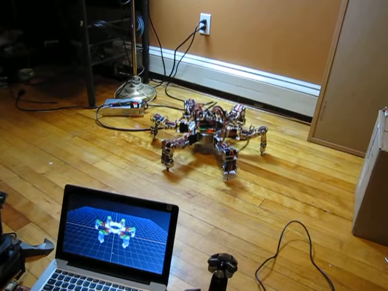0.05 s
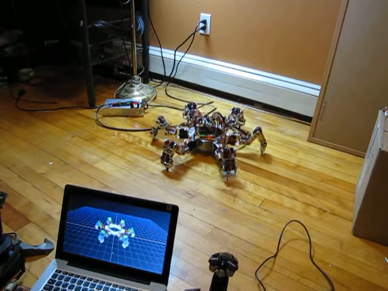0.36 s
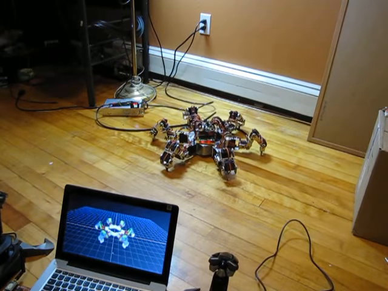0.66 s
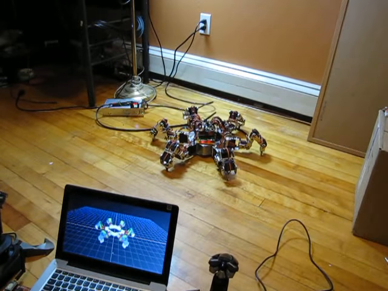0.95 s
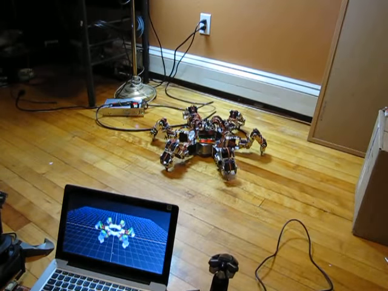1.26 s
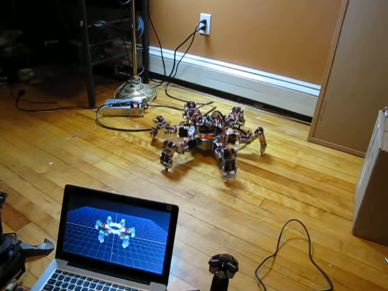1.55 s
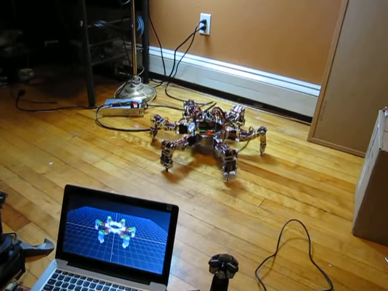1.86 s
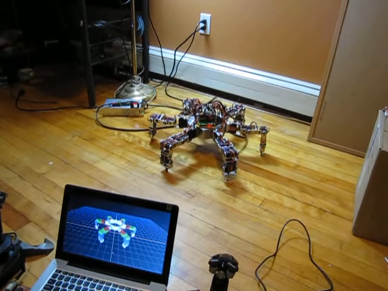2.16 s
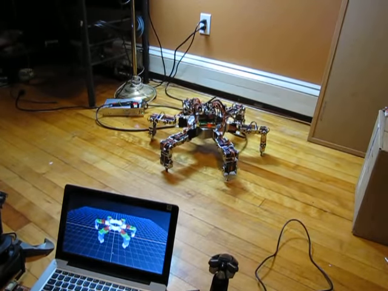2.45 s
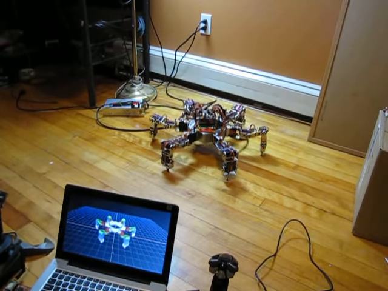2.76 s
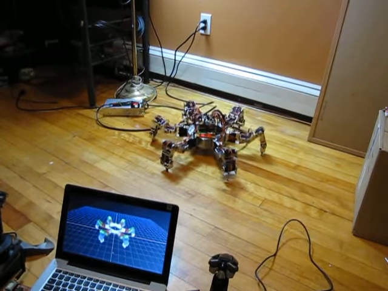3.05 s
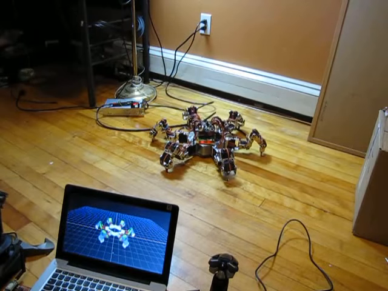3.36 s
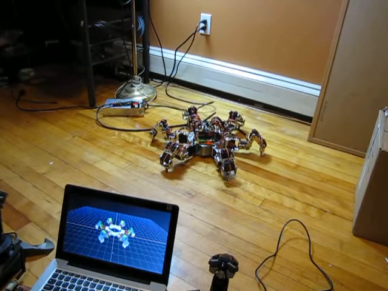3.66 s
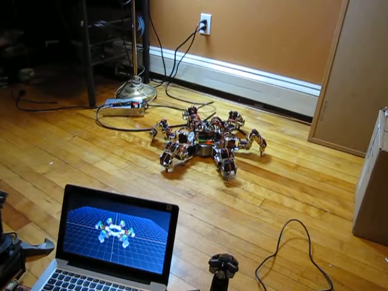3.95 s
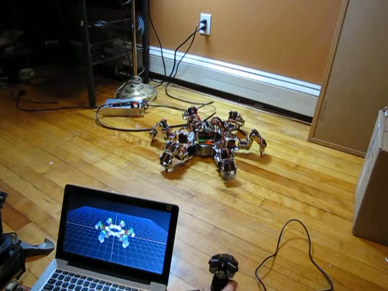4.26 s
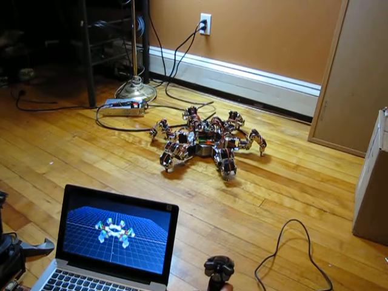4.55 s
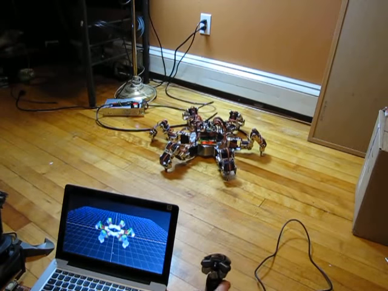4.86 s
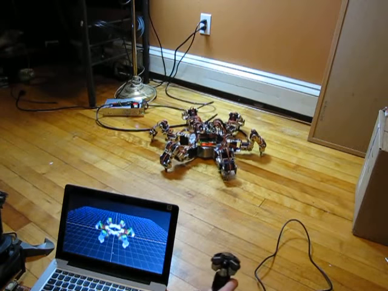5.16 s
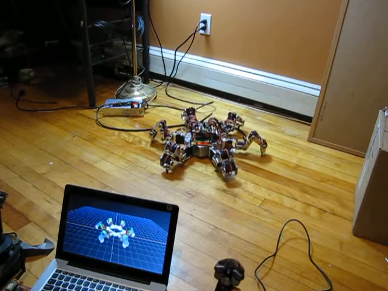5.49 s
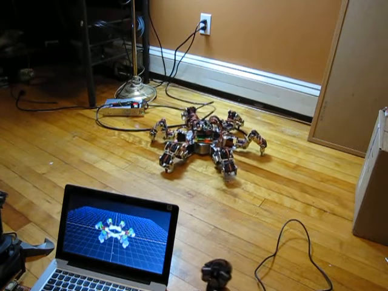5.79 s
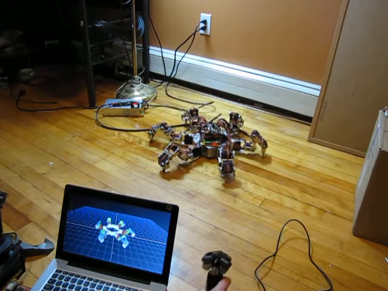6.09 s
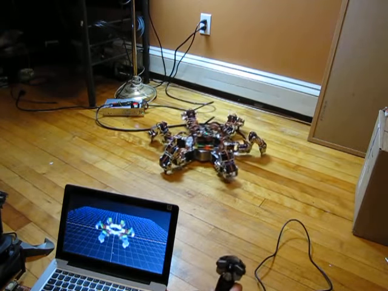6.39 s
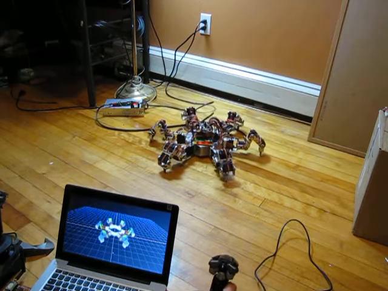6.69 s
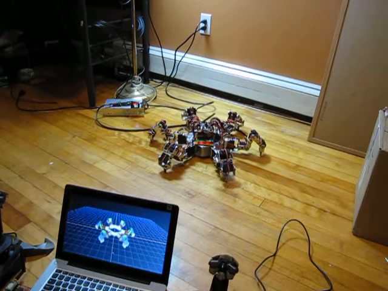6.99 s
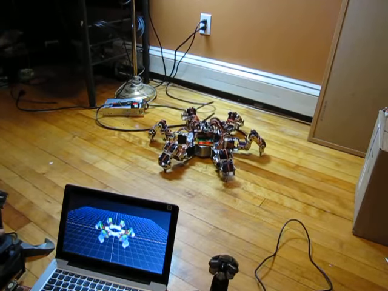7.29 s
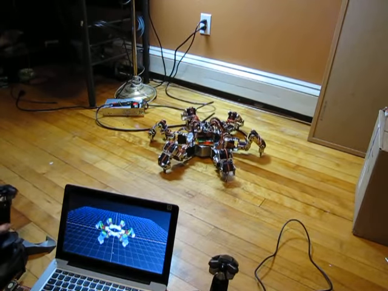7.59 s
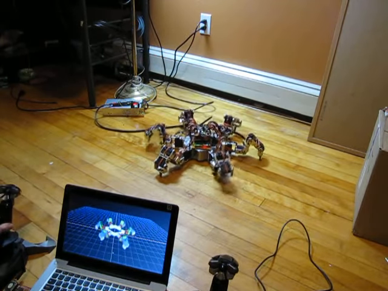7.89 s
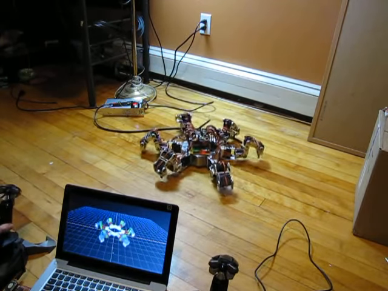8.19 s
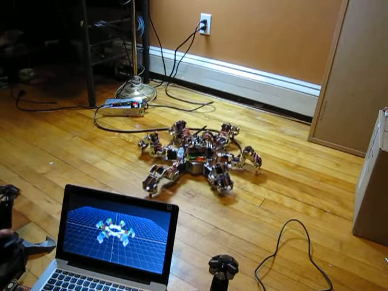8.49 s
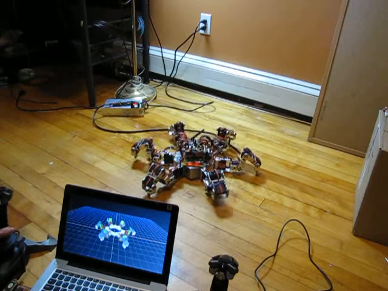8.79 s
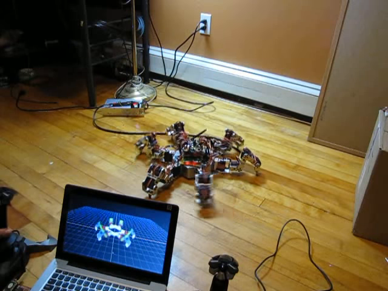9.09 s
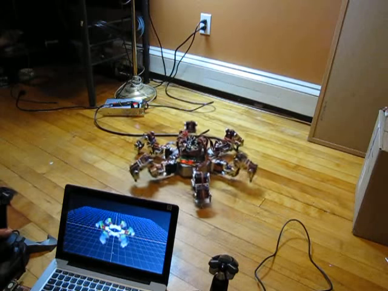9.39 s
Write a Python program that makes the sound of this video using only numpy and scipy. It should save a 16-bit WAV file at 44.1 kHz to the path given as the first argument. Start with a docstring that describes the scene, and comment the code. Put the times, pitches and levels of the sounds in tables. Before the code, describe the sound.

A small legged robot moves on a hardwood floor, heard from nearby in a small room with a faint hum and low rumble. From the start, servo motors whir in short, high, buzzy bursts, each with a rattle of linkage and a low drone in the boards. Hard feet clack and thump, strongly at about 0.5 seconds, then around 1.5, 2 and 2.8 to 3.3 seconds. A lull follows until about 4.6 seconds, when small twitching ticks and whirs return and grow busier. Brief high squeaks come near 6 and 6.5 seconds, with firm foot knocks around 6.3 to 6.6. From 6.7 to 7.6 seconds the motors tick rapidly and evenly while holding still. Then the robot walks, with quick repeated whirs and the loudest clacks and thumps at about 8, 8.4 and 9 seconds, whirring on until about 9.4 seconds.

```python
"""Six-legged robot on hardwood

A robot flexes, then walks across the floor of a small room. Its servo gears whir in bursts, rattle
the linkage and drone through the legs into the boards; hard feet clack down and thump the floor.
While it holds a pose, the servos tick at each control pulse. A hum and a low rumble lie underneath."""
import sys
import numpy as np
from scipy import signal
from scipy.fft import rfft, irfft
from scipy.io import wavfile

SR = 44100
rng = np.random.default_rng(int(sys.argv[2]) if len(sys.argv) > 2 else 0)


def wav_record(signal):
    """Record a signal, one row per channel, as 16-bit PCM in the file named by sys.argv[1]."""
    frames = np.transpose(np.atleast_2d(signal))
    bounded = np.clip(frames, -1, 1)
    # unit amplitude maps onto the largest positive 16-bit level
    quanta = np.round(bounded * 32767).astype(np.int16)
    wavfile.write(sys.argv[1], SR, quanta)


N = 416304
TIME, HZ = np.arange(N) / SR, np.fft.rfftfreq(N, 1 / SR)
CONTROL_TIME = TIME[::64]  # coarse clock for the servo envelopes

# EQ curves of the three noise beds: freq_hz, gain_db
AIR_EQ = [(12, -28), (20, -8), (44, -9), (62, -4), (80, -13), (123, -17), (172, -22), (410, -17),
          (542, -26), (590, -16), (660, -48), (1570, -32), (1710, -31.5), (9400, -42), (16000, -48)]
RUMBLE_EQ = [(8, -7), (15, 11), (20, 10), (25, -9), (36, 0), (48, -28), (63, -0.5), (80, -22), (110, -5),
             (200, -67)]
RUSH_EQ = [(100, 4), (300, 3), (600, 2.5), (1100, 5), (1700, -0.5), (2500, -8), (5000, -40)]
# Fader rides of the rumble and the soft rush: time_s, rumble_db, rush_db
BED_FADERS = [(0, -35, -45.5), (1.0, -51, -46.5), (1.6, -36.5, -47), (2.4, -45, -51.5), (3.2, -37.5, -53.5),
              (4.1, -66, -56), (7.5, -63, -57.5), (8.6, -51, -48), (9.44, -50, -70)]
# Partials of the hum: pitch_hz, level_db
HUM_PARTIALS = [(118.4, -62), (258.4, -63.5), (360.7, -67), (602.9, -64.5), (1556, -66.5)]
# Faint passing tones: start_s, end_s, start_pitch_hz, end_pitch_hz, jitter_hz, level_db
PASSING_TONES = [(0.65, 1.38, 108, 108, 1.05, -52), (2.15, 2.65, 160, 161, 1.3, -50.5),
                 (0.74, 1.18, 1020, 1060, 44.4, -53), (0.76, 1.5, 1200, 1240, 57, -59)]
# Reverb time of the room: freq_hz, t60_s
ROOM_DECAY = [(100, 0.14), (400, 0.36), (1500, 0.3), (5000, 0.28), (10000, 0.15), (16000, 0.13)]
# Left-right likeness of diffuse sound: freq_hz, correlation
STEREO_LIKENESS = [(30, 0.74), (250, 0.84), (640, 0.82), (1400, 0.61), (3100, 0), (6800, 0), (15000, 0.12)]
# Balance of the two microphones: freq_hz, left_minus_right_db
MIC_BALANCE = [(30, 3.5), (120, 2), (300, 1.2), (1000, 1.5), (2000, -0.5), (4500, 0.8), (8000, 1),
               (12000, -1)]

# Servo start-up chirps, foot scuffs and joint squeaks: start_s, end_s, pitch_hz, width_hz, level_db
SQUEAKS_AND_CHIRPS = [(1.206, 1.26, 5200, 911, -46), (2.608, 2.643, 5000, 807, -41),
                      (2.759, 2.823, 522, 220, -39), (4.223, 4.3, 2215, 1190, -58),
                      (4.35, 4.52, 1505, 300, -63), (5.99, 6.129, 5324, 300, -32.5),
                      (6.063, 6.18, 290.6, 25, -35.5), (6.503, 6.545, 4110, 60, -29),
                      (6.701, 7.618, 2340, 300, -58), (8.212, 8.311, 4810, 150, -38.5),
                      (8.699, 8.748, 3300, 300, -36.5), (8.711, 8.775, 464, 100, -41)]
# Feet landing and joints knocking, clack level before its trim:
# start_s, clack_db, thump_db, tilt_db_per_octave, leg_pitch_hz, leg_over_clack_db
FOOTFALLS = [(0.06, -27, -41, -3, 2210, -1), (0.1469, -30.5, -41, -8.5, 2220, 7),
             (.246, -25, -21.5, -0.5, 2040, -3), (.271, -25, -31, -8.5, 1700, -18),
             (0.4706, -14, -14.5, -5, 3640, -3.5), (1.5422, -18, -26, -1.5, 2770, -17),
             (1.6036, -22, -30, -4.5, 2380, -12), (1.934, -19, -29, -3.5, 1910, -19),
             (2.002, -18, -31, -3, 2900, -22), (2.074, -23, -32, -2, 1767, -10),
             (2.8386, -18.5, -22, 1.5, 2265, -4), (3.107, -17, -20.5, 0, 2090, -16),
             (3.2497, -17, -18, -2.5, 3136, -9), (5.503, -29.5, -30.5, -5, 2333, -11),
             (6.296, -15.5, -17.5, -2.5, 2245, -7), (6.38, -14, -14.5, -3, 2500, -24),
             (6.562, -20.5, -21.5, -5.5, 2690, -15), (6.59, -25.5, -41, -4.5, 2290, -16),
             (7.93, -27.5, -35, -2, 1414, 0), (7.988, -16, -16, -2.5, 2210, -17),
             (8.0111, -12, -17, -1, 3545, 3.5), (8.0229, -14.5, -17.5, 16, 3845, .5),
             (8.4296, -11.5, -10.5, -4, 2357, -20), (8.439, -13.5, -13.5, 4.5, 3530, -3),
             (8.614, -27.5, -23, -14, 1390, -1.5), (9.0494, -13.5, -14.5, 4.5, 2746, -17),
             (9.0557, -18.5, -20, -4, 2556, 2), (9.071, -18, -23, -0.5, 1670, 2.5)]
# Ringing modes of the floorboards: pitch_hz, relative_level_db, t60_s
BOARD_MODES = [(117.3, -24.5, 0.48), (147.6, -0.5, 0.14), (213.1, -3, 0.2), (260.7, 0, 0.1),
               (303, -2, 0.17), (345.7, -8.5, 0.2), (442, -15.5, 0.2), (482.5, -13.5, 0.13),
               (630, -20, 0.096)]
# Servos kicking in or twitching, levels before the trim: start_s, level_db
TWITCHES = [(.332, -16.5), (.7168, -55), (1.203, -40), (1.8045, -32), (2.6117, -32), (4.2344, -40),
            (4.6337, -44), (4.726, -38), (5.053, -39), (5.368, -34), (5.6388, -26.5)]
# Leg movements, one servo run each, levels before the trims:
# start_s, length_s, whir_db, rattle_db, drone_db, whine_hz
LEG_MOVES = [(0.0, 0.085, -28, -35, -33, 4560), (0.209, 0.039, -36, -37, -36, 5016),
             (0.259, .11, -28, -34.5, -32.5, 5234), (0.398, 0.093, -31, -35.5, -38, 4420),
             (0.808, .06, -56, -58, -57, 4800), (1.194, 0.044, -43, -43, -43, 4420),
             (1.245, 0.05, -35, -46, -38, 4768), (1.341, .14, -36, -44, -38, 4764),
             (1.529, 0.1, -36, -40.5, -35, 4865), (1.799, .16, -34, -39.5, -40.5, 5160),
             (2.001, 0.14, -33, -37.5, -36, 4703), (2.516, .05, -47, -54, -48, 5100),
             (2.6, 0.045, -33, -40.5, -41, 4970), (2.663, 0.038, -32, -35.5, -31.5, 4500),
             (2.733, 0.14, -32, -35.5, -34.5, 4592), (2.994, 0.081, -34, -37.5, -33.5, 5131),
             (3.088, .07, -30, -36, -32, 4700), (3.209, 0.12, -31, -38.5, -36, 4616),
             (4.712, .03, -36, -46.5, -39, 4913), (4.914, 0.028, -47.5, -60, -52, 4933),
             (5.05, 0.062, -34, -44, -46, 5060), (5.115, 0.086, -29, -41, -42.5, 4800),
             (5.304, 0.029, -38, -44, -42, 5296), (5.384, 0.11, -28.5, -38.5, -37, 5150),
             (5.64, .05, -30, -41, -37.5, 4943), (5.715, .025, -37, -46, -50, 4830),
             (5.775, .065, -27, -39, -37.5, 4977), (5.901, 0.083, -28, -37, -38.5, 5000),
             (5.99, 0.11, -25, -38.5, -33.5, 5260), (6.18, 0.19, -25, -35.5, -36.5, 4960),
             (6.444, 0.11, -26, -36, -32.5, 4910), (6.644, .045, -35, -45, -40.5, 4838),
             (7.576, 0.11, -27, -35, -30.5, 4902), (7.765, 0.049, -26.5, -39.5, -43, 4833),
             (7.854, .045, -25.5, -38, -46, 5178), (7.914, 0.11, -25, -31.5, -33.5, 5120),
             (8.1, .05, -34, -43, -41.5, 4840), (8.188, .1, -30.5, -43.5, -58, 4784),
             (8.31, .11, -28.5, -42, -62, 4765), (8.49, .09, -33, -35, -32.5, 4889),
             (8.577, 0.085, -28.5, -34.5, -39, 5028), (8.7, 0.049, -41, -35, -53, 5026),
             (8.955, 0.052, -36, -40.5, -44, 4790), (9.028, .09, -31.5, -34, -33.5, 4883),
             (9.173, 0.067, -30.5, -37.5, -45, 4578), (9.294, 0.095, -34.5, -38.5, -55, 4620)]
# The pose held under load, same columns
HELD_POSE = (6.72, .85, -47.5, -44, -44, 4794)
SERVO_RUNS = LEG_MOVES + [HELD_POSE]
# Envelopes of the servo layers: level_column, rise_s, fade_db_per_s, rest_db
WHIR_ENV, RATTLE_ENV, DRONE_ENV = (2, .028, 190, -68), (3, .009, 110, -61.5), (4, .035, 92, -61.5)
# Bass ride on the floor drone: time_s, gain_db
DRONE_BASS_FADER = [(0, 4), (3.4, 4.5), (4.7, -2.5), (7.8, -5.5), (8.6, 2.5)]
# EQ curves of foot clack, servo tick, floor drone, linkage rattle and gear whir: freq_hz, gain_db
CLACK_EQ = [(40, -9), (150, -5), (450, -5.5), (800, 0), (1300, -3), (2000, 3.5), (2700, 4.5), (3600, 4.5),
            (4600, 1.5), (6500, -2.5), (9000, -10.5), (15000, -22)]
TICK_EQ = [(800, -34), (2400, 0), (3500, -6.5), (4800, 1), (6500, 1), (9000, -8), (12500, -12),
           (16000, -14)]
DRONE_EQ = [(25, -42), (60, -12), (100, -10.5), (150, -2), (215, -2), (300, -3), (360, -13), (450, -18.5),
            (800, -36)]
RATTLE_EQ = [(60, -32), (250, -28), (450, -1.5), (800, 1.5), (1200, -1), (1700, 2), (2300, 1), (3000, 0.5),
             (4500, -5.5), (8000, -15)]
WHIR_EQ = [(1000, -37), (2500, -16), (3950, -8.5), (4350, -3), (5200, -4), (6400, -5), (7900, -6.5),
           (9200, -12), (10600, -16), (12500, -14.5), (14000, -23.5), (16000, -33)]


def amp(db):
    """Decibels to gain."""
    return 10 ** (np.asarray(db) / 20)


def unit_rms(x):
    """Normalises to rms 1."""
    return x / np.sqrt(np.mean(x ** 2) + 1e-20)


def curve_at(curve, hz):
    """Reads a curve on a log-frequency axis."""
    freq_hz, value = np.transpose(curve)
    return np.interp(np.log(hz + 1), np.log(freq_hz + 1), value)


def add(mix, start_s, sound):
    """Drops a sound into the mix at its cue."""
    part = mix[max(round(start_s * SR), 0):][:len(sound)]
    part += sound[:len(part)]


def colour(x, eq):
    """Applies an EQ curve and normalises to rms 1."""
    return unit_rms(irfft(rfft(x) * amp(curve_at(eq, HZ)), N))


def wander(rate_hz):
    """Random modulator: low-passed noise at rms 1."""
    return unit_rms(irfft(rfft(rng.standard_normal(N)) / (1 + (HZ / rate_hz) ** 4), N))


def diffuse(pair):
    """Two unrelated signals as two close microphones hear them: alike in the bass."""
    left, other = rfft(pair)
    likeness = np.clip(curve_at(STEREO_LIKENESS, np.fft.rfftfreq(pair.shape[1], 1 / SR)), -1, 1)
    right = likeness * left + np.sqrt(1 - likeness ** 2) * other
    return irfft(np.array([left, right]), pair.shape[1])


def diffuse_noise(eq):
    """Coloured stereo noise from all sides."""
    return colour(diffuse(rng.standard_normal((2, N))), eq)


def room(x, wet_db, lag_s=2.8e-5, predelay_s=.003):
    """The direct sound reaches the right microphone first; the walls add a short tail."""
    t = np.arange(SR // 2) / SR
    echoes = rng.choice([-1., 1.], (2, len(t))) * (rng.random((2, len(t))) < .3)
    hz, age_s, bands = signal.stft(echoes, SR, nperseg=256)
    bands = bands * amp(-60 * age_s / curve_at(ROOM_DECAY, hz)[:, None])
    tail = signal.istft(bands, SR, nperseg=256)[1][:, :len(t)] * (t > predelay_s)
    tail /= np.linalg.norm(tail, axis=1)[:, None]
    direct = np.array([irfft(rfft(x) * np.exp(-2j * np.pi * HZ * lag_s), N), x])
    wet = diffuse(signal.fftconvolve(x[None], tail, axes=1)[:, :N])
    return (direct + amp(wet_db) * wet) / np.sqrt(1 + amp(2 * wet_db))


def scatter(x, eq, smear_s):
    """Bounces among the moving legs and the floor: diffuse noise that trails the power of x."""
    pole = np.exp(-1 / (smear_s * SR))
    power = signal.lfilter([1 - pole], [1, -pole], x ** 2 + 1e-20)
    return np.sqrt(power) * diffuse_noise(eq)


def impact(eq, tilt_db, chatter, chatter_s, contact_s=.0025, size=4096):
    """A sharp hit, a crunch of contact and a dying chatter of loose parts, at energy 1."""
    t, hz = np.arange(size) / SR, abs(np.fft.fftfreq(size, 1 / SR))
    contact, loose = rng.standard_normal((2, size)) * np.exp(-t / np.array([[contact_s], [chatter_s]]))
    hit = contact / np.linalg.norm(contact) + chatter * loose / np.linalg.norm(loose)
    hit[0] = .7  # the leading spike
    log_gain = np.log(amp(curve_at(eq, hz) + tilt_db * np.log2(np.maximum(hz, 500) / 3000)))
    minimum_phase = np.exp(signal.hilbert(log_gain).conj())  # keeps the attack crisp
    sound = np.fft.ifft(np.fft.fft(hit) * minimum_phase).real
    return sound / np.linalg.norm(sound)


def room_tone(air_db=-53):
    """The bed: steady air, with a low rumble and a soft rush that swell and sink."""
    time_s, rumble_db, rush_db = np.transpose(BED_FADERS)
    air = amp(air_db) * diffuse_noise(AIR_EQ)
    rumble = amp(np.interp(TIME, time_s, rumble_db)) * diffuse_noise(RUMBLE_EQ)
    rush = amp(np.interp(TIME, time_s, rush_db)) * diffuse_noise(RUSH_EQ)
    return air + rumble + rush


def hum_and_tones(waver_db=1.0):
    """A gently wavering hum, and a few faint tones that come and go."""
    out = np.zeros(N)
    for hz, db in HUM_PARTIALS:
        out += np.sqrt(2) * amp(db - waver_db * wander(2.3)) * np.sin(2 * np.pi * hz * TIME)
    for start_s, end_s, start_hz, end_hz, jitter_hz, db in PASSING_TONES:
        size = round((end_s - start_s) * SR)
        pitch_hz = np.linspace(start_hz, end_hz, size) + jitter_hz * wander(64)[:size]
        tone = np.sin(2 * np.pi * np.cumsum(pitch_hz) / SR)
        add(out, start_s, amp(db) * unit_rms(tone * signal.windows.tukey(size, .4)))
    return out


def squeaks_and_chirps():
    """Servo start-up chirps, foot scuffs and joint squeaks: each sings briefly in one resonance."""
    out = np.zeros(N)
    for start_s, end_s, hz, width_hz, db in SQUEAKS_AND_CHIRPS:
        size = round((end_s - start_s) * SR)
        note = wander(width_hz)[:size] * np.sin(2 * np.pi * hz * TIME[:size])
        add(out, start_s, amp(db) * unit_rms(note * signal.windows.tukey(size, .5)))
    return room(out, wet_db=-9)


def board_thump(t, rise_s=.0081, detune=.012):
    """Struck boards swell into a low ring, tuned a little differently from spot to spot."""
    ring = np.zeros(len(t))
    for hz, db, t60_s in BOARD_MODES:
        cycles = hz * (1 + detune * rng.standard_normal()) * t + rng.random()
        ring += amp(db - 60 * t / t60_s) * np.sin(2 * np.pi * cycles)
    return ring * (1 - np.exp(-t / rise_s))


def footsteps(clack_trim_db=21, leg_t60_s=.0067, bounce_db=-7):
    """A hard foot clacks down, its leg rings briefly and the floor thumps."""
    clacks, thumps, t = np.zeros(N), np.zeros(N), np.arange(SR // 2) / SR
    for start_s, clack_db, thump_db, tilt_db, leg_hz, leg_db in FOOTFALLS:
        gain = amp(clack_db + clack_trim_db)
        leg = np.sin(2 * np.pi * leg_hz * t) * amp(-60 * t / leg_t60_s)
        add(clacks, start_s, gain * impact(CLACK_EQ, tilt_db, chatter=1.0, chatter_s=.0085))
        add(clacks, start_s, gain * amp(leg_db) * leg / np.linalg.norm(leg))
        add(thumps, start_s, amp(thump_db) * board_thump(t))
    return (room(clacks, wet_db=-1) + amp(bounce_db) * scatter(clacks, CLACK_EQ, smear_s=.0041)
            + room(thumps, wet_db=-10))


def hold_pulses(first_s=6.7465, every_s=.03634, count=23, spread_db=1.7):
    """Tick cues (start_s, level_db), one per control pulse, growing unevenly as the pose is held."""
    levels_db = np.linspace(-33, -28.5, count) + spread_db * rng.standard_normal(count)
    return list(zip(first_s + every_s * np.arange(count), levels_db))


def servo_ticks(trim_db=16):
    """A loaded servo jerks against its gear play at each twitch or control pulse."""
    out = np.zeros(N)
    for start_s, db in TWITCHES + hold_pulses():
        add(out, start_s, amp(db + trim_db) * impact(TICK_EQ, tilt_db=0, chatter=1.8, chatter_s=.002))
    return room(out, wet_db=-8) + .7 * scatter(out, TICK_EQ, smear_s=.002)


def run_power(run, envelope):
    """Power of one layer in one servo run: it rises as the motors spin up, holds, then dies away."""
    level_column, rise_s, fade_db_per_s, _ = envelope
    start_s, length_s = run[:2]
    t = CONTROL_TIME - start_s
    level_db = run[level_column] - fade_db_per_s * np.maximum(t - length_s, 0)
    return (np.clip(t / rise_s, 0, 1) * amp(level_db)) ** 2


def layer_gain(envelope):
    """Fader of one servo layer: all runs add in power over the resting level."""
    rest_db = envelope[-1]
    power = amp(2 * rest_db) + sum(run_power(run, envelope) for run in SERVO_RUNS)
    return np.interp(TIME, CONTROL_TIME, np.sqrt(power))


def floor_drone(crossover_hz=147):
    """Gear vibration runs down the legs and drones in the boards, deeper in some poses than others."""
    noise = colour(rng.standard_normal(N), DRONE_EQ)
    bass = irfft(rfft(noise) / (1 + (HZ / crossover_hz) ** 6), N)
    bass_gain = amp(np.interp(TIME, *np.transpose(DRONE_BASS_FADER)))
    return noise - bass + bass_gain * bass


def pinion_whine(width_hz=520, drift=.05):
    """The fuzzy note of meshing pinions, sliding toward the pitch of the loudest run."""
    weights = np.array([run_power(run, WHIR_ENV) for run in SERVO_RUNS]) + 1e-12
    mesh_hz = np.array(SERVO_RUNS)[:, -1] @ weights / weights.sum(0)
    pitch_hz = np.interp(TIME, CONTROL_TIME, mesh_hz) * (1 + drift * wander(14))
    return unit_rms(wander(width_hz) * np.cos(2 * np.pi * np.cumsum(pitch_hz) / SR))


def gear_knocks(effort, motors=6, sway=.1, uneven=.14, swell_db=3):
    """Each motor knocks its gears once a turn, faster with effort, and drifts in level on its own."""
    out = np.zeros(N)
    for base_hz in np.linspace(110, 330, motors):
        turns = np.cumsum(base_hz * effort ** .15 * np.exp(sway * wander(6))) / SR
        knocks = np.diff(np.floor(turns), prepend=0)
        out += knocks * (1 + uneven * rng.standard_normal(N)) * amp(swell_db * wander(7.5))
    return unit_rms(out)


def servos(whir_trim_db=-4, whine_trim_db=-6, rattle_trim_db=-4, drone_trim_db=-1):
    """Knocking, sliding teeth whir in the servo cases, rattle the linkage and drone in the boards."""
    whir_gain = layer_gain(WHIR_ENV)
    knocks = gear_knocks(effort=np.clip(whir_gain / amp(-29.5), .2, 2))
    sliding_grit = rng.standard_normal(N) * amp(2.5 * wander(160))
    whir = amp(whir_trim_db) * whir_gain * colour(knocks + sliding_grit, WHIR_EQ)
    chatter = 1.38 * rng.standard_normal(N) * amp(2.7 * wander(72))
    rattle = amp(rattle_trim_db) * layer_gain(RATTLE_ENV) * colour(knocks + chatter, RATTLE_EQ)
    drone = amp(drone_trim_db) * layer_gain(DRONE_ENV) * floor_drone()
    whine = amp(whine_trim_db) * whir_gain * pinion_whine()
    body = room(whir + rattle + whine, wet_db=-8)
    bounced = scatter(whir, WHIR_EQ, smear_s=.002) + .7 * scatter(rattle, RATTLE_EQ, smear_s=.003)
    return body + bounced + room(drone, wet_db=-11.5)


def scene():
    """The robot over the bed of its room."""
    return servos() + servo_ticks() + footsteps() + squeaks_and_chirps() + room_tone() + hum_and_tones()


def record(dry, cutoff_hz=16000):
    """Two slightly unlike microphones, clipping at full scale, then a steep high cut."""
    balance_db = curve_at(MIC_BALANCE, HZ) * np.array([[.5], [-.5]])
    heard = irfft(rfft(dry) * amp(balance_db), N)
    high_cut = signal.firwin(511, cutoff_hz, window=("kaiser", 9), fs=SR)
    return signal.oaconvolve(np.clip(heard, -1, 1), high_cut[None], "same")


dry = scene()
out = record(dry)
wav_record(out)
```